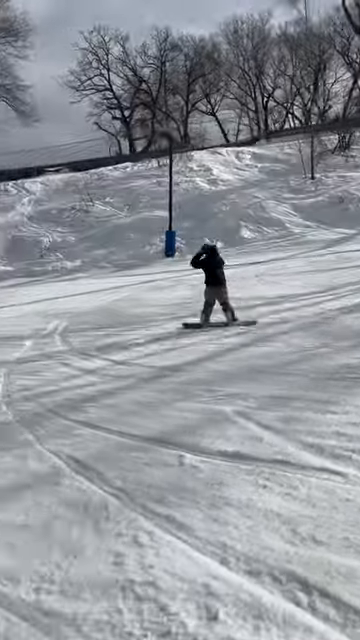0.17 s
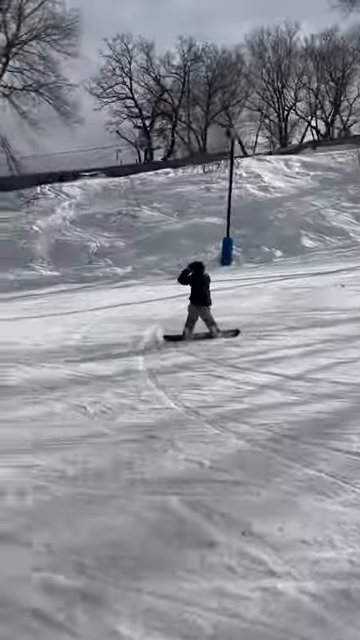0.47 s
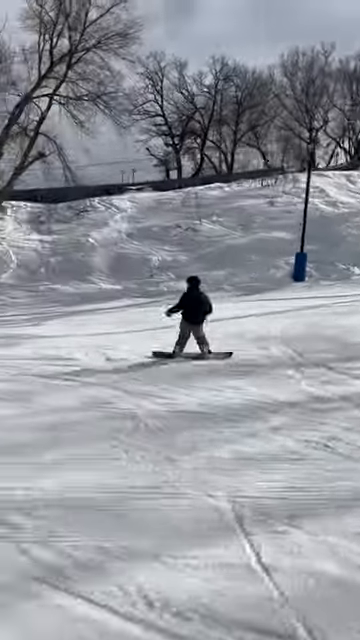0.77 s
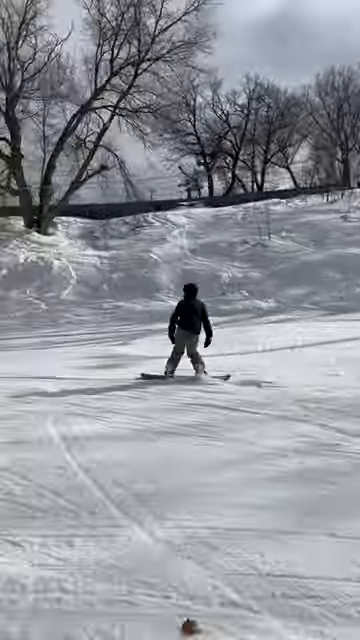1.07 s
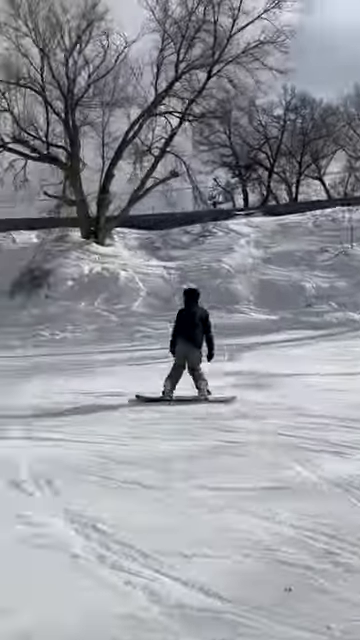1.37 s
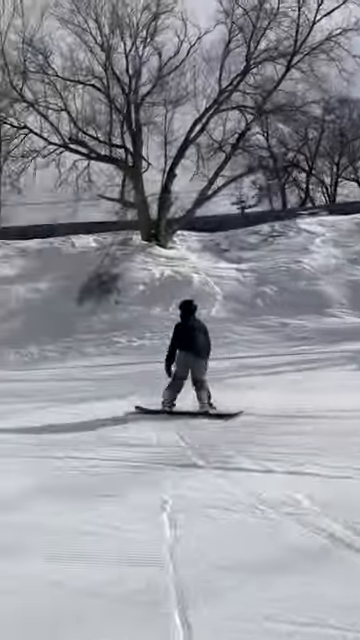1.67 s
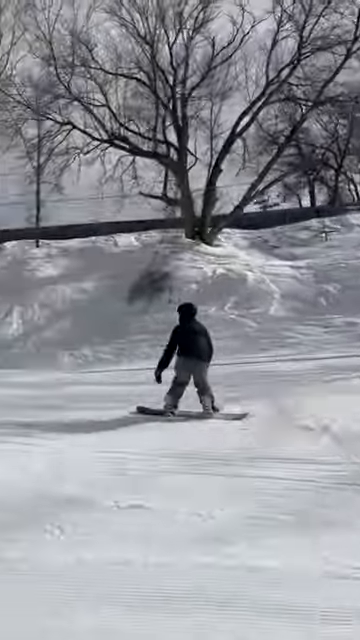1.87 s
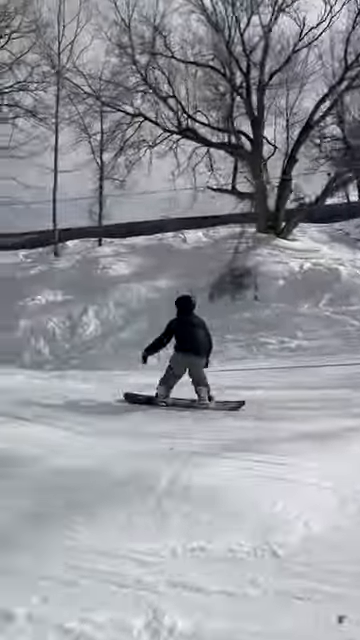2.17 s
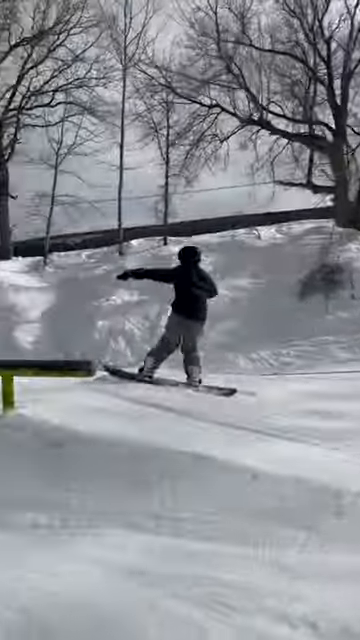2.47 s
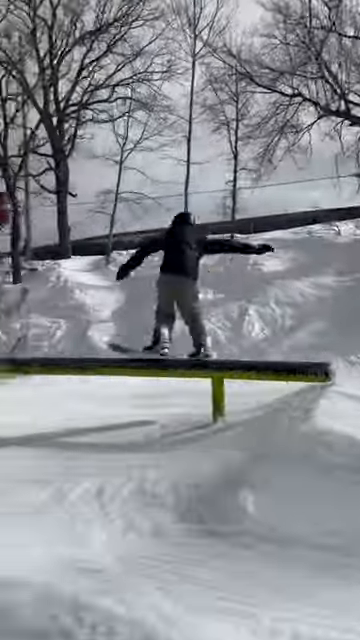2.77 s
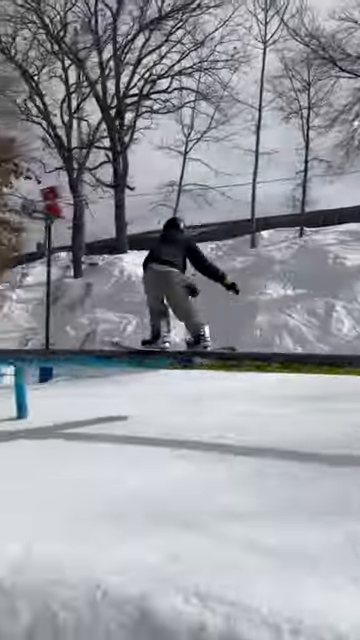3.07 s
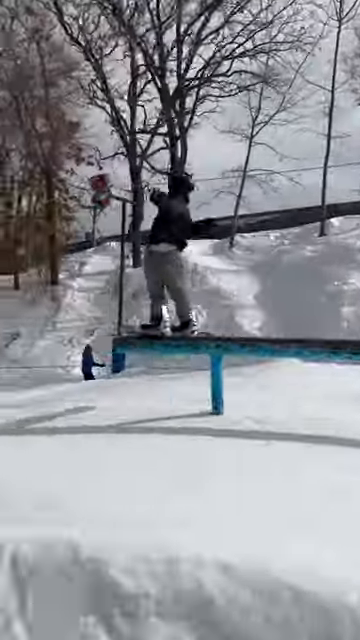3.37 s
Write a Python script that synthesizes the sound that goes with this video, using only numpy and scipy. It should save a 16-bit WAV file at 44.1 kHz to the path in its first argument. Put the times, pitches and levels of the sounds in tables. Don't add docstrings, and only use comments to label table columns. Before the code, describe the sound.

Snowboard crunching and scraping over packed snow in buffeting wind, then a sharp clack on a rail

```python
import sys
import numpy as np
from scipy import signal
from scipy.fft import rfft, irfft, next_fast_len
from scipy.io import wavfile

SR = 44100
rng = np.random.default_rng(int(sys.argv[2]) if len(sys.argv) > 2 else 0)


def persist_wave(psi):
    counts = np.round(np.clip(psi, -1, 1) * 32767).astype(np.int16)
    wavfile.write(sys.argv[1], SR, np.atleast_2d(counts).T)


def makeup_ratio(level_db):
    decades = np.asarray(level_db, float) / 20
    return 10 ** decades


N = 154791
T, SIZE = np.arange(N) / SR, next_fast_len(N, True)
HZ = np.maximum(np.arange(SIZE // 2 + 1) * SR / SIZE, 1)
START_S = 0.0348


def rms_one(x):
    return x / np.sqrt(np.mean(x ** 2) + 1e-20)


def low_pass(x, hz):
    return signal.sosfilt(signal.butter(2, hz, fs=SR, output="sos"), x)


def in_time(rows):
    s, *columns = np.transpose(rows)
    return [np.interp(T, s, c) for c in columns]


def drift(rate_hz):
    r = np.exp(-40 * np.pi * rate_hz / SR)
    white = rng.standard_normal(N // 20 + 3002)
    slow = signal.lfilter([1], [1, -2 * r, r * r], white)[3000:]
    return np.interp(np.arange(N) / 20, np.arange(len(slow)), rms_one(slow - slow.mean()))


def shape(points):
    hz, db = np.transpose(points)
    ends = 1 / (1 + (hz[0] / HZ) ** 8) / (1 + (HZ / hz[-1]) ** 20)
    return rms_one(makeup_ratio(np.interp(np.log(HZ), np.log(hz), db)) * ends)


def coloured(envelope, mid, side, side_db, patchy_db=0., patchy_hz=10, together=0.27):
    a, b = rfft(envelope * rng.standard_normal((2, N)), SIZE)
    quadrature = 0.12
    mixed = 1j * np.sqrt(quadrature) * a + np.sqrt(1 - quadrature) * b
    pair = np.array([a * shape(mid), makeup_ratio(side_db) * shape(side) * mixed])
    if not patchy_db:
        return irfft(pair, SIZE)[:, :N]
    shared = together * drift(patchy_hz)
    limits_hz = np.array([min(mid[0][0], side[0][0]), max(mid[-1][0], side[-1][0])])
    first, last = (1.5 * np.log2(limits_hz / 25)).astype(int)
    place = np.clip(1.5 * np.log2(HZ / 25), first, last + 1)
    out = np.zeros((2, N))
    for k in range(first, last + 2):
        band = irfft(pair * np.maximum(1 - abs(place - k), 0), SIZE)[:, :N]
        out += band * makeup_ratio(patchy_db * (shared + drift(patchy_hz)))
    return out


def bursts(rows, onset_s):
    power = np.zeros(N)
    for s, db, decay_s in rows:
        first = int(s * SR)
        age = T[first:int((s + 0.2) * SR)] - s + 1 / SR
        rise = (1 - np.exp(-age / onset_s)) ** 2
        power[first:][:len(age)] += makeup_ratio(2 * db) * rise * np.exp(-2 * age / max(decay_s, 3e-4))
    return np.sqrt(power)


def swells(rows):
    power = np.zeros(N)
    for s, db, up, down in rows:
        power += makeup_ratio(2 * db) * np.exp(-((T - s) / np.where(T < s, up, down)) ** 2)
    return np.sqrt(power)


def random_hits(per_s, flicker_db, flicker_hz, spread_db):
    born = rng.random(N) < per_s * makeup_ratio(flicker_db * drift(flicker_hz)) / SR
    return born * makeup_ratio(spread_db * np.minimum(rng.exponential(1, N), 3))


# (time [s], peak level [dB])
BREAKS = [(.0513, -19), (.07, -25.5), (.0807, -20.5), (.093, -21.5), (.1152, -27), (.123, -19),
          (.138, -24.5), (.1885, -24.5), (.206, -27), (.226, -26.5), (.2713, -26), (.302, -44),
          (.3387, -31), (.35, -20.5), (.3606, -29), (.3975, -22), (.412, -27), (.422, -24.5),
          (.467, -52), (.5392, -31), (.556, -34), (.5816, -46.5), (.598, -28), (.625, -34),
          (.65, -25.5), (.6859, -23), (.7385, -27), (.748, -25), (.858, -22), (.871, -26),
          (0.8776, -20), (0.9027, -23), (0.935, -22), (0.9538, -18), (0.964, -25.5), (0.974, -27.5),
               (0.985, -20.5), (.997, -43.5), (1.0868, -19.5), (1.101, -33), (1.14, -19.5), (1.1543, -11),
               (1.163, -16), (1.185, -19.5), (1.197, -24.5), (1.207, -33), (1.22, -18.5), (1.2547, -39),
               (1.278, -29), (1.29, -25.5), (1.315, -27.5), (1.386, -31.5), (1.403, -32.5), (1.422, -24.5),
               (1.5027, -34), (1.5399, -14), (1.554, -18.5), (1.6034, -20), (1.623, -30), (1.633, -20),
               (1.649, -18.5), (1.664, -23), (1.6765, -13.5), (1.686, -17.5), (1.692, -16.5), (1.7295, -21),
               (1.735, -29), (1.7415, -17), (1.7526, -26), (1.763, -27), (1.772, -20.5), (1.78, -24),
               (1.79, -46), (1.8045, -24.5), (1.812, -23), (1.822, -26.5), (1.856, -27), (1.8673, -21.5),
               (2.0065, -19), (2.014, -18), (2.026, -16), (2.409, -29)]
# (time [s], level [dB], rise [s], fall [s])
DIGS = [
    (1.16, -36.5, 0.015, 0.067),
    (1.55, -41.5, 0.013, 0.063),
    (1.69, -33.5, 0.031, 0.0089),
    (1.8, -25.5, 0.069, 0.019),
    (2.025, -30.5, 0.013, 0.0051),
]
# (frequency [Hz], density [dB per Hz])
SNOW_HZ = [(800, 0.5), (1200, -3.5), (2000, 0), (3900, -3.5), (4900, -8.5), (6000, -5), (10000, -20),
           (15800, -12)]
SNOW_SIDE = [(500, -12), (1300, -10), (3000, 7), (5000, -3.5), (6500, -11), (8500, -6), (11000, -21),
             (15800, -25)]
SNOW_SIDE_DB = -4.5


def crust():
    rows = BREAKS
    onset_s, snap_s = 0.0026, 0.002
    body_s, body_db, body_cut_hz = 0.016, -8.5, 4100
    snaps = makeup_ratio(6) * bursts([(s - onset_s / 2, db, snap_s) for s, db in rows], onset_s)
    digs = swells(DIGS)
    push = np.hypot(snaps, digs * makeup_ratio(3 * drift(250)))
    rough = coloured(push, SNOW_HZ, SNOW_SIDE, SNOW_SIDE_DB, patchy_db=3.0, patchy_hz=60, together=0)
    thuds = bursts([(s, db + body_db, body_s) for s, db in rows], 0.003)
    body = low_pass(coloured(thuds, SNOW_HZ, SNOW_SIDE, SNOW_SIDE_DB), body_cut_hz)
    gliding = makeup_ratio(in_time(GLIDE)[0] + in_time(GRIT)[0] + 10)
    return rough + body + ticks(digs + gliding)


def ticks(strength):
    cycles, side_db = 14.4, -2.5
    sizes = random_hits(350, 3.0, 30, spread_db=5) * rng.choice([-1, 1], N)
    pitch, out = rng.integers(0, 20, N), np.zeros((2, N))
    hz_points, db_points = np.transpose(SNOW_HZ)
    for k, hz in enumerate(np.geomspace(1100, 9500, num=20)):
        r, w = makeup_ratio(-60 * hz / (cycles * SR)), 2 * np.pi * hz / SR
        hits = strength * sizes * (pitch == k) + 1e-18
        ring = signal.lfilter([0, np.sin(w)], [1, -2 * r * np.cos(w), r * r], hits)
        ring = ring * makeup_ratio(np.interp(np.log(hz), np.log(hz_points), db_points)) * hz / 3000
        quarter_cycle = int(SR / hz / 4)
        out += [ring, makeup_ratio(side_db) * np.roll(ring, quarter_cycle)]
    return makeup_ratio(-8) * out


# (time [s], level [dB], dullness [dB])
GLIDE = [
    (0.04, -43, 6.5),
    (1.81, -43, 3),
    (3.5, -55.5, 5),
]
# (time [s], level [dB])
GRIT = [(.04, 5.5), (1.3, -5.5), (1.44, -11.5), (2.05, -4.5), (2.15, -1.5), (3.5, -9)]
# (frequency [Hz], density [dB per Hz])
BED_HZ = [(900, -12.5), (1300, 2.5), (2000, 4), (3000, -4.5), (4300, -8), (5500, -11), (10000, -22),
          (15800, 2.5)]
BED_SIDE = [(300, -2), (1000, 6), (2000, -3), (4000, -5), (6500, -13), (8500, -20), (11000, -30),
            (15800, -20)]


def glide():
    db, dull_db = in_time(GLIDE)
    grit_db, = in_time(GRIT)
    grain_s, grain_db, snow_db = 0.0013, -13, 4
    sizes = random_hits(130, 4.0, 5, spread_db=10)
    grains = np.sqrt(signal.lfilter([1], [1, -np.exp(-2 / (grain_s * SR))], sizes + 1e-18))
    bed = coloured(1, BED_HZ, BED_SIDE, 1.0, patchy_db=1.6, patchy_hz=30, together=0.6)
    low = low_pass(bed, 2500)
    grit = coloured(grains, SNOW_HZ, SNOW_SIDE, SNOW_SIDE_DB)
    return makeup_ratio(db + snow_db) * (bed - low + makeup_ratio(dull_db) * low + makeup_ratio(grain_db + grit_db) * grit)


# (time [s], level [dB], rise [s], fall [s])
SHAVES = [
    (1.05, -36.5, 0.023, 0.053),
    (1.93, -49, 0.0083, 0.0077),
    (2.05, -40, 0.016, 0.0043),
    (2.09, -56, .015, 0.0074),
    (2.215, -34.5, 0.0085, 0.0078),
    (2.39, -40.5, 0.03, 0.03),
    (2.565, -33, 0.012, 0.014),
    (2.93, -34, 0.02, 0.042),
    (3.02, -42, 0.029, 0.039),
]
# (time [s], peak level [dB])
SCUFFS = [(1.2644, -18), (1.279, -14.5), (1.3588, -22), (1.3973, -18), (1.501, -17), (1.866, -14),
          (1.9114, -31), (1.925, -15.5), (1.9684, -33), (1.9864, -21), (2.0794, -21), (2.0906, -20),
          (2.1695, -21), (2.1959, -34), (2.2134, -26), (2.2628, -28), (2.2772, -24), (2.361, -19.5),
          (2.3737, -19), (2.393, -17), (2.4077, -15), (2.448, -22.5), (2.5434, -35), (2.5546, -23),
          (2.568, -32), (2.6399, -23), (2.741, -24), (2.9178, -30), (2.9264, -31), (2.9556, -30),
          (2.9756, -30), (3.028, -24), (3.2084, -30), (3.297, -33)]


def far_shaves():
    lumps = bursts([(s, db - 5.5, 0.0035) for s, db in SCUFFS], 0.00096)
    push = np.hypot(swells(SHAVES) * makeup_ratio(3.2 * drift(200)), lumps)
    return low_pass(coloured(push, BED_HZ, BED_SIDE, -2), 3340)


# (time [s], peak level [dB])
CLACKS = [
    (2.8075, -34),
    (2.8135, -10),
    (2.8205, -22),
    (2.8618, -24),
    (2.8715, -33),
]
# (frequency [Hz], density [dB per Hz])
CLACK_HZ = [(800, -4.5), (2000, 5.5), (4000, -6.5), (7000, -1.5), (9800, -5.5), (11500, 22), (13200, 14),
            (15000, 20)]
CLACK_SIDE = [(800, -5), (3000, -1.5), (9000, -1), (15700, -9)]


def rail_clacks():
    hits = [(s, db, 0.0009) for s, db in CLACKS]
    tails = [(s, db - 29, 0.012) for s, db in CLACKS]
    return makeup_ratio(14.5) * coloured(bursts(hits + tails, 0.00041), CLACK_HZ, CLACK_SIDE, side_db=-16)


def rail_slide():
    rub_hz, slip_hz = 4400, 8800
    thin = [(rub_hz * 0.85, -12), (rub_hz, 0), (rub_hz * 1.12, -12)]
    rub = coloured(swells([(3.11, -57.5, 0.045, 0.16)]), thin, thin, -1)
    band = [(slip_hz / 3, -14), (slip_hz, 0), (slip_hz * 2.3, -6)]
    slip = coloured(swells([(3.395, -51, 0.024, 0.024)]), band, band, 1.5)
    return rub + slip


# (time [s], level [dB])
BUFFET = [(.04, -33), (.09, -30.5), (.21, -33), (.51, -31), (.61, -28), (.76, -25.5), (.91, -25.5),
          (1.11, -28.5), (1.39, -27.5), (1.6, -31.5), (1.82, -28.5), (2.0, -34.5), (2.06, -28.5),
          (2.26, -31), (2.39, -30), (2.7, -32.5), (3.0, -34), (3.5, -32.5)]
# (frequency [Hz], density [dB per Hz])
BUFFET_HZ = [(15, -50), (25, -31.5), (55, 1.5), (81, 6), (500, -12.5), (650, -50), (1100, -120)]
# (time [s], side level [dB])
TURN = [(.04, 20.5), (.5, 8.5), (.8, -2.5), (2.0, 5), (3.5, -17)]
# (time [s], level [dB])
POPS = [
    (0.749, -31),
    (1.809, -21),
    (2.07, -17),
    (2.181, -21.5),
    (2.387, -24),
    (2.698, -20),
]


def buffeting():
    db, = in_time(BUFFET)
    turn_db, = in_time(TURN)
    low = makeup_ratio(db) * coloured(0.93, BUFFET_HZ, BUFFET_HZ, -16.5, patchy_db=1.5, patchy_hz=25, together=1.0)
    deep = low_pass(low, 200)
    low = deep + (low - deep) * makeup_ratio(0.54 * (db - db.mean()))
    pop_hz, pop_s = 98, 0.0055
    for s, pop_db in POPS:
        age = T - s
        low[0] -= makeup_ratio(pop_db) * np.cos(2 * np.pi * pop_hz * age) * np.exp(-(age / pop_s) ** 2)
    low[1] = low[1] * makeup_ratio(turn_db) - 0.14 * low[0]
    return low


# (time [s], level [dB], sideways share [dB])
GUST = [(.04, -45, 14), (.45, -44, 11), (.6, -45, 14.5), (.76, -37, 9.5), (.95, -35.5, 9), (1.8, -36, 5.5),
        (2.2, -39, 6), (3.0, -37.5, 5), (3.5, -45.5, 2.5)]
# (frequency [Hz], density [dB per Hz])
GUST_HZ = [(120, -31), (200, -6), (339, -3), (409, -4), (814, -1.5), (1280, -8.5), (4000, -89), (5200, -66),
           (8800, -120)]
GUST_SIDE = [(35, -35), (60, 2), (302, -33), (589, -6), (1230, 10), (2920, -4), (4000, -31.5), (5200, -37),
             (8800, -120)]


def rush():
    db, side_db = in_time(GUST)
    air = makeup_ratio(db + 2.5) * coloured(0.99, GUST_HZ, GUST_SIDE, -6.5, patchy_db=2.5, patchy_hz=34.5)
    air[1] *= makeup_ratio(side_db)
    return air


# (frequency [Hz], density [dB per Hz])
AIR_HZ = [(1500, -15), (3200, -24), (4300, -2.5), (6000, -3), (10000, -7.5), (15800, -12)]


def far_air():
    return makeup_ratio(-61) * coloured(makeup_ratio(0.85 * drift(18)), AIR_HZ, AIR_HZ, 0.5)


# (time [s], frequency [Hz], share cancelled [0 to 1])
HOLLOW = [(.04, 910, 0), (.14, 970, 0.74), (.28, 790, 0.1), (.37, 790, 0.45), (.47, 804, 1),
          (.62, 1060, 0.28), (.85, 1160, 0.48), (1.1, 1200, 0.36), (1.2, 1200, 0.023)]


def hollowed(x):
    hz, share = in_time(HOLLOW)
    turn = np.exp(2j * np.pi * np.cumsum(hz) / SR)
    band = signal.sosfiltfilt(signal.butter(2, 128, fs=SR, output="sos"), x / turn)
    return x - 2 * share * (band * turn).real


def scene():
    own_board = crust() + glide()
    far_board = far_shaves() + rail_clacks() + rail_slide()
    wind = buffeting() + rush() + far_air()
    mid, side = (own_board + far_board + wind) * (T >= START_S)
    mid = hollowed(mid)
    return np.array([mid + side, mid - side])


def top_cut(x):
    return signal.sosfilt(signal.butter(12, 15830, fs=SR, output="sos"), x)


def record(dry):
    top = 1 / (1 + np.exp(-(HZ - 10300) / 120))
    top_rise = 1 / (1 + np.exp(-(HZ - 15300) / 250))
    mid_db = -11 * np.exp(-((HZ - 4950) / 190) ** 2) - 40 * top + 18 * top_rise
    side_db = -10.5 * np.exp(-((HZ - 6760) / 990) ** 4) - 9.5 * top
    spectra = rfft([dry[0] + dry[1], dry[0] - dry[1]], SIZE) * makeup_ratio(np.array([mid_db, side_db]))
    mid, side = irfft(spectra, SIZE)[:, :N] * (T >= START_S) / 2
    limit = 0.75
    mix = limit * np.tanh(np.array([mid + side, mid - side]) / limit)
    return top_cut(mix)


dry = scene()
out = record(dry)
persist_wave(out)
```